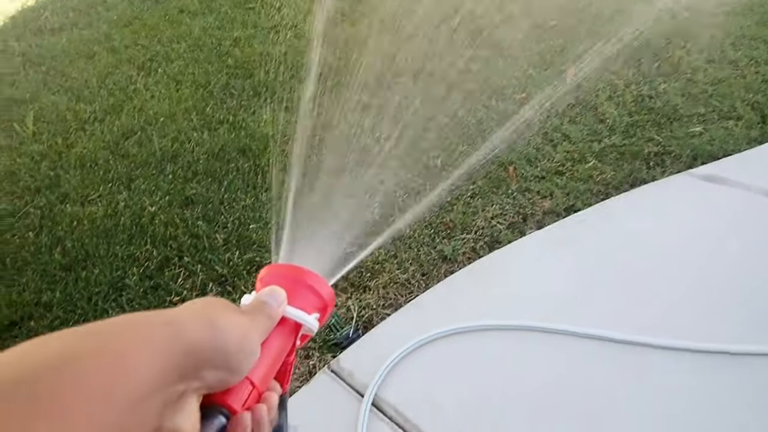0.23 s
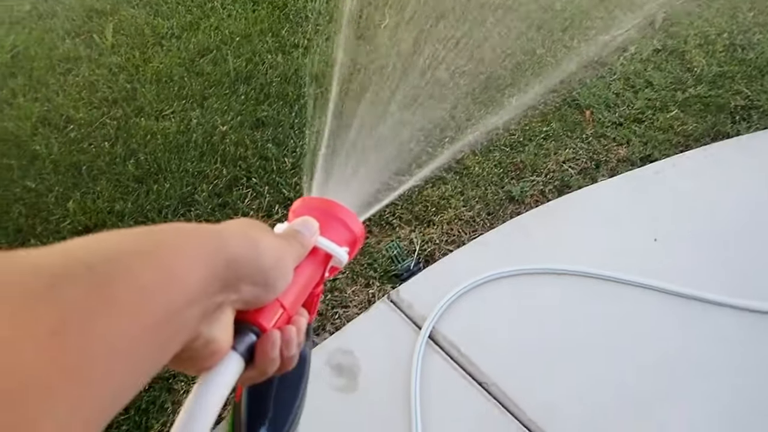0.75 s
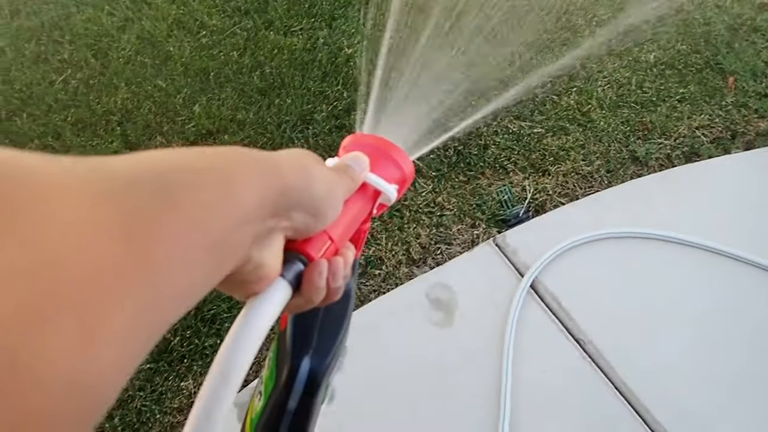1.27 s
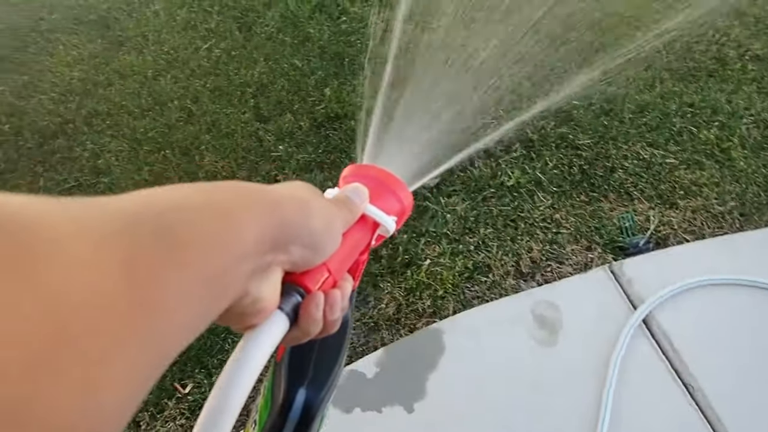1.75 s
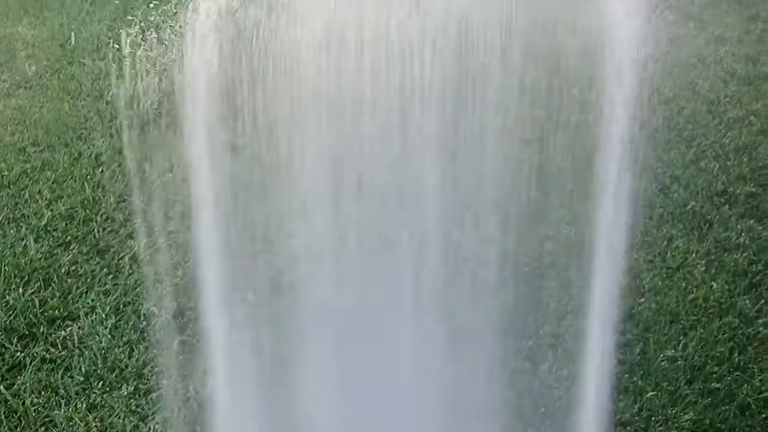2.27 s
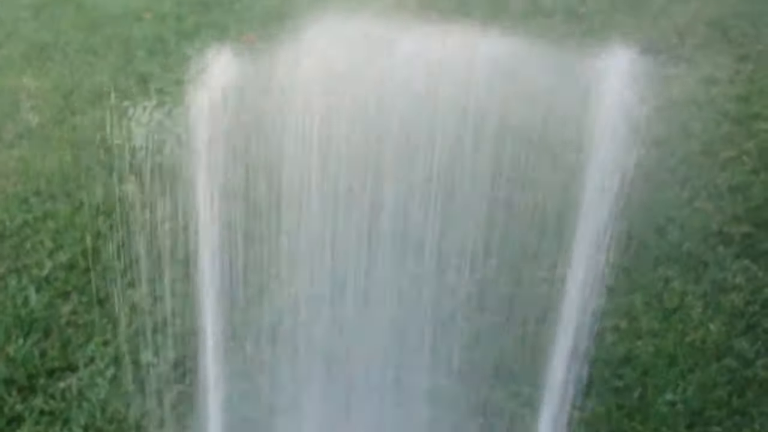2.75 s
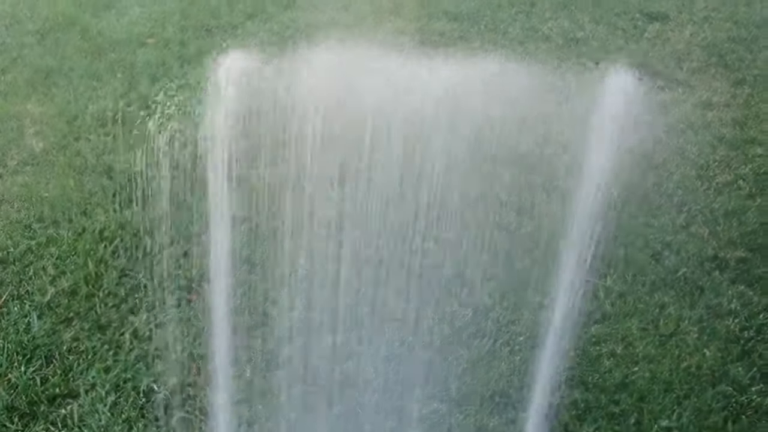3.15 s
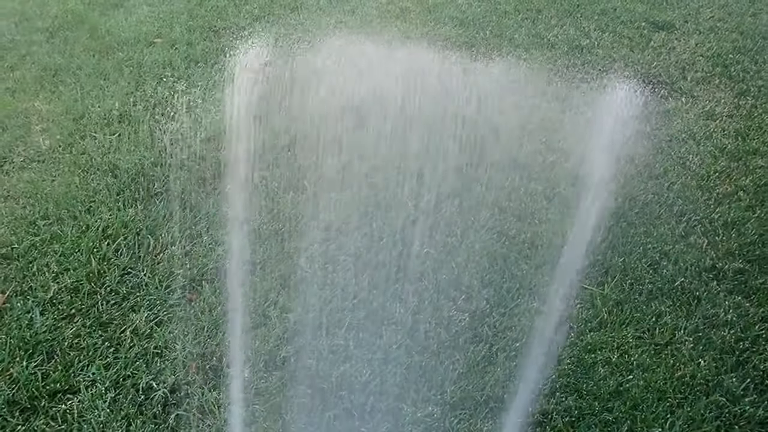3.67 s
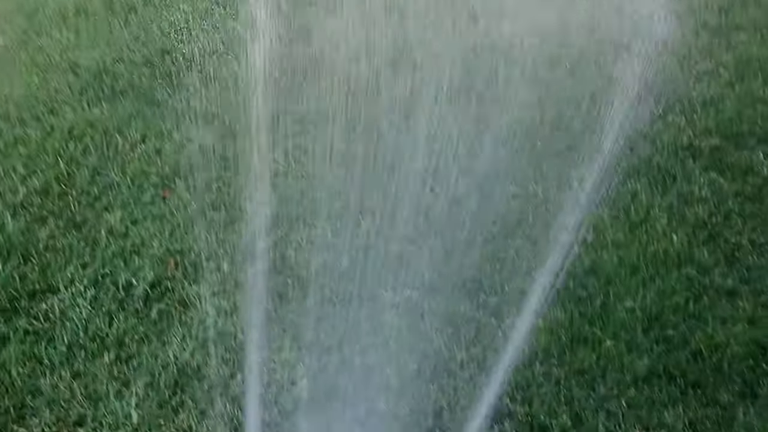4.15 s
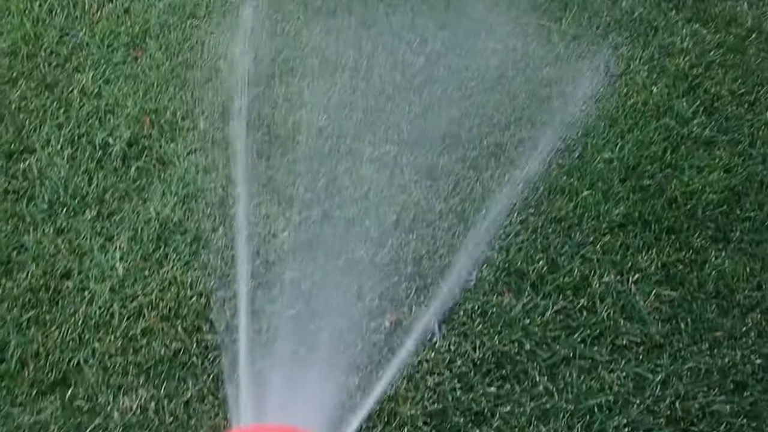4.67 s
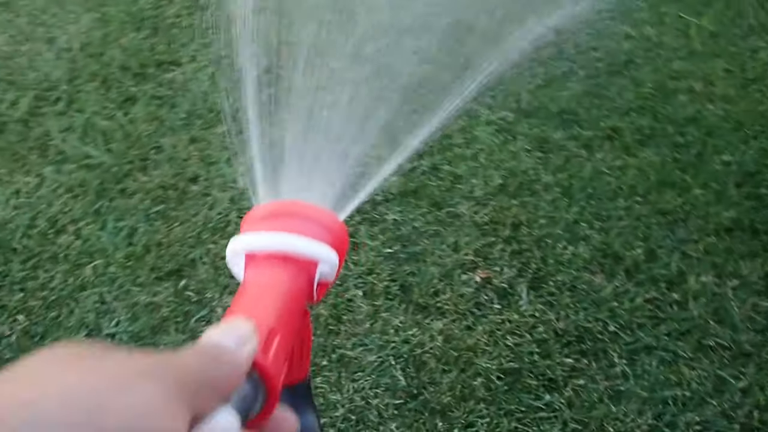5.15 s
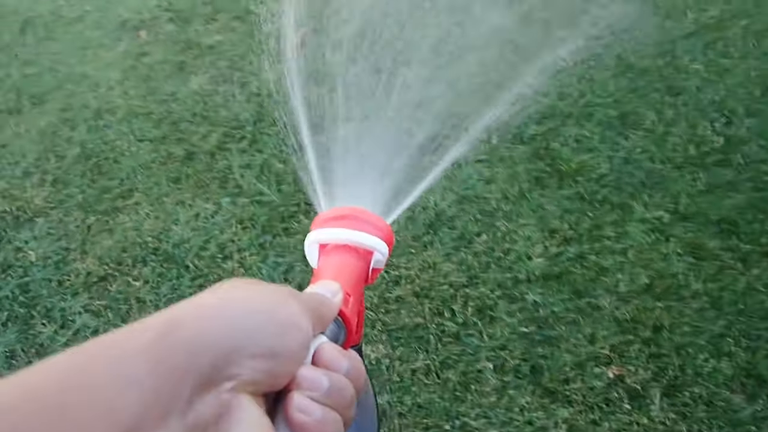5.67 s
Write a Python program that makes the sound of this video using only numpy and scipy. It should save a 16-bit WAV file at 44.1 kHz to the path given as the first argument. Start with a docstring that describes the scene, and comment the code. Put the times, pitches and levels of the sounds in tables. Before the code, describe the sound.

Water hisses from a handheld hose nozzle and patters on a lawn, with small spits and one brief dropout.

```python
"""On a lawn, a hand-held garden hose nozzle throws a fan of water. Puffs of air and a faint hose hum sit
at the back; the sheet of water tears into a fine fizz and into drops that patter on the grass. Up front,
trapped air spits out now and then, and turbulence in the slit hisses. The sound cuts out for an instant,
comes back from right beside the fan, then draws back behind the nozzle again."""
import sys
import numpy as np
from scipy.fft import rfft, irfft
from scipy.io import wavfile
from scipy.ndimage import uniform_filter1d, map_coordinates

SR = 44100
rng = np.random.default_rng(int(sys.argv[2]) if len(sys.argv) > 2 else 0)


def wav_record(signal):
    """Record a signal, one row per channel, as 16-bit PCM in the file named by sys.argv[1]."""
    frames = np.transpose(np.atleast_2d(signal))
    bounded = np.clip(frames, -1, 1)
    # unit amplitude maps onto the largest positive 16-bit level
    quanta = np.round(bounded * 32767).astype(np.int16)
    wavfile.write(sys.argv[1], SR, quanta)


N = 261072
TIME = np.arange(N) / SR
FREQ = np.maximum(np.arange(N // 2 + 1) * SR / N, 1)
MUTE_FROM_S, MUTE_TO_S = 1.9875, 2.1072


def from_db(db):
    """Decibels to gain."""
    return 10 ** (np.asarray(db) / 20)


def unit_power(x):
    """Normalise to an RMS of 1."""
    return x / np.sqrt(np.mean(x ** 2) + 1e-20)


def automation(rows):
    """One lane per value column, interpolated at every sample."""
    times, *columns = np.transpose(rows)
    return [np.interp(TIME, times, column) for column in columns]


def curve(points):
    """Breakpoints joined over log frequency, at every bin."""
    hz, value = np.transpose(points)
    return np.interp(np.log(FREQ), np.log(hz), value)


def drift(rate_hz):
    """Random modulation up to about this rate, RMS 1."""
    return unit_power(irfft(rfft(rng.standard_normal(N)) / (1 + (FREQ / rate_hz) ** 2), N))


def flutter(depth_db, rate_hz):
    """A gain that swells and sinks at random."""
    return from_db(depth_db * drift(rate_hz))


def grains(per_s, spread_db):
    """Two independent streams of tiny impacts: many small, few large."""
    sizes = from_db(spread_db * np.minimum(rng.exponential(1, (2, N)), 4))
    return unit_power(sizes * rng.standard_normal((2, N)) * (rng.random((2, N)) < per_s / SR))


def around(bearing, centre_deg, width_deg):
    """A soft bump, 1 at its centre."""
    return np.exp(-((bearing - centre_deg) / width_deg) ** 2)


# How alike the two mic ports sound: f/Hz, correlation
PORT_LIKENESS = [(30, .4), (70, .5), (130, .85), (300, .98), (1000, .998), (1500, .9998), (3400, .998),
                 (4200, .88), (5000, .93), (6000, .88), (7200, .97), (8600, .88), (9750, .68), (10700, .9),
                 (15000, .9)]
# Their balance: f/Hz, left over right/dB
PORT_BALANCE = [(100, -.7), (1000, 0), (3600, 0), (4150, -3), (4700, 3.3), (5800, 1), (6600, 3),
                (7500, 1.3), (8600, 4.8), (10500, 2.3), (14000, 2.8)]
# Their phase offset: f/Hz, left lead/rad
PORT_LEAD = [(3800, 0), (4350, -.8), (5200, -.05), (6200, -.3), (7200, 0), (8200, -.35), (9800, .2),
             (14000, .25)]

def stereo(streams, eq):
    """EQ two streams and spread them as mid and side over the mic ports, at unit power."""
    mid, side = rfft(streams) * eq
    likeness = np.clip(curve(PORT_LIKENESS), 0, 1)
    sign = np.array([[1], [-1]])
    pair = np.sqrt(1 + likeness) * mid + np.sqrt(1 - likeness) * side * sign
    balance = from_db(sign * curve(PORT_BALANCE) / 2)
    lead = np.exp(.5j * sign * curve(PORT_LEAD))
    return unit_power(irfft(pair * balance * lead, N))


# Soft puffs of air: t/s, level/dB, half-width/s
AIR_PUFFS = [(2.396, -46, 0.02), (2.678, -53, 0.04), (3.288, -47.5, 0.018)]
# Their low rumble: f/Hz, level/dB
DRAUGHT_EQ = [(10, -20), (60, -8), (130, -7), (250, -8), (500, -34)]

def draught():
    """Air pulled along by the water brushes the mic."""
    envelope = sum(from_db(db) * np.exp(-.5 * ((TIME - t) / width) ** 2) for t, db, width in AIR_PUFFS)
    return envelope * stereo(rng.standard_normal((2, N)), from_db(curve(DRAUGHT_EQ)))


# Partials of the hose and grip: f/Hz, starting level/dB
HUM_PARTIALS = [(235, -58), (292, -62), (935, -58)]

def hose_hum():
    """The flow hums in the hose while the grip is close by, wavering and fading until the mute."""
    hum = np.zeros(N)
    for hz, db in HUM_PARTIALS:
        phase = 2 * np.pi * np.cumsum(hz * (1 + 0.01315 * drift(rate_hz=9.5))) / SR
        hum += from_db(db) * np.sqrt(2) * np.sin(phase) * flutter(depth_db=3, rate_hz=8.2)
    return hum * from_db(-1.8 * TIME) * (TIME < MUTE_FROM_S)


# Drops on grass, from behind the nozzle: f/Hz, level/dB
PATTER_BEHIND_EQ = [(15, -47.5), (60, -11.5), (130, -5), (330, -0.5), (580, 1), (670, -6), (780, 2.5),
                    (1300, 2), (1700, 3.5), (2220, 4), (2600, -6), (3200, -14.5), (4500, -17)]
# The same from beside the fan: f/Hz, level/dB
PATTER_BESIDE_EQ = [(15, -35), (60, -18), (170, -9.5), (280, -4.5), (570, -1), (680, -7), (820, 0.5),
                    (1350, 1.5), (1850, -3), (2250, -1), (2600, -10.5), (3200, -16), (3800, -9),
                    (5000, -67)]

def patter(near_db, behind):
    """Drops land on the grass in a dense wash; two colours crossfade as the mic moves round."""
    rear = stereo(grains(per_s=16000, spread_db=2), from_db(curve(PATTER_BEHIND_EQ)))
    side = stereo(grains(per_s=14000, spread_db=1.6), from_db(curve(PATTER_BESIDE_EQ)))
    wash = np.sqrt(behind) * from_db(-37) * rear + np.sqrt(1 - behind) * from_db(-38.5) * side
    return from_db(near_db) * wash * flutter(depth_db=0.66, rate_hz=20)


def pan_treble(x, left_db):
    """The mic's body shades only short waves, so only the top above 4 kHz moves sideways."""
    treble = 1 / (1 + (4000 / FREQ) ** 16)
    change = from_db(left_db * np.array([[.5], [-.5]])) - 1
    return x + irfft(rfft(change * x) * treble, N)


# Airy top of the finest droplets: f/Hz, level/dB
MIST_EQ = [(3000, -82), (9000, -27), (10200, -12), (10850, -11), (11500, -11), (12000, -6.5), (12700, 0),
           (13400, -3), (14300, -5), (14900, -15.5), (15700, -14.5)]

def mist(near_db, behind):
    """The edge of the sheet tears into a fine fizz, which leans left beside the fan."""
    fizz = stereo(grains(per_s=26000, spread_db=2), from_db(curve(MIST_EQ)))
    fizz *= flutter(depth_db=.5, rate_hz=54)
    gain = from_db(-32 + 0.49 * near_db)  # rises about half as many dB as the patter
    return pan_treble(gain * fizz, left_db=3.4 * (.4 - behind))


# Air pockets bursting at the slit: t/s, pop peak before EQ/dB
AIR_POCKETS = [(0.098, -20), (0.105, -20), (0.1177, -20), (0.1974, -25.5), (0.2706, -25), (0.3186, -17.5),
               (0.577, -19), (0.7133, -20.5), (1.0809, -23), (1.1829, -22.5), (1.4112, -25), (1.5623, -24),
               (1.8968, -27), (1.9029, -19.5), (1.933, -20), (4.1235, -23.5)]
# Their bright attack: f/Hz, level/dB
CRACK_EQ = [(800, -39), (2400, -12.5), (3400, -8.5), (4300, -8), (5200, 3), (6200, -6.5), (7000, -10),
            (9300, -11.5), (11000, -8), (15000, -26.5)]

def spits():
    """Each air pocket gives the slit a sharp crack and pops for a couple of cycles."""
    rise_s, crack_over_pop_db = .0006, 13
    pops, clicks = np.zeros(N), np.zeros(N)
    for t, db in AIR_POCKETS:
        hz = min(1833 + 300 * t, 2200)  # big pockets leave first, so the pitch climbs and levels off
        peak = int((t + rise_s) * SR)
        span = np.arange(peak - SR // 200, peak + SR // 200)
        cycles = (span - peak) / SR * hz
        pops[span] += from_db(db) * np.exp(-.5 * (cycles / 0.83) ** 2) * np.cos(2 * np.pi * cycles)
        clicks[peak - int(SR / hz / 4)] = from_db(db + crack_over_pop_db)  # a quarter cycle early
    crack_eq = from_db(curve(CRACK_EQ))
    crack_spectrum = rfft(clicks) * crack_eq / irfft(crack_eq, N).max()
    port_dip = from_db(-6 * np.exp(-((FREQ - 3100) / 650) ** 4))  # the mic ports are dull here
    return irfft((rfft(pops) + crack_spectrum) * port_dip, N)


def rim_shadow(x, bearing):
    """The lower hiss thins out where the rim hides the slit, so the hiss seems to rise in pitch."""
    lows = irfft(rfft(x) / (1 + (FREQ / 6950) ** 20), N)
    duck_db = -3.5 * around(bearing, centre_deg=133, width_deg=15)
    return x + lows * (from_db(duck_db) - 1)


# Bounce off the hand and arm: t/s, delay/ms
ARM_DELAY = [(0, 1.523), (.45, 1.488), (1.2, 1.44), (2.0, 1.48), (2.1, .75), (5.9, .72)]

def arm_comb(x, behind):
    """From behind the hand its reflection combs the hiss, and the comb slides as the hand moves."""
    delay_ms, = automation(ARM_DELAY)
    read_at = (TIME - delay_ms / 1000) * SR
    reflection = np.array([map_coordinates(channel, [read_at], order=3) for channel in x])
    return x + 0.12 * behind * reflection


# The nozzle's low, middle and high resonances: f/Hz, width/Hz
NOZZLE_BANDS = [(5010, 840), (6650, 1200), (8120, 1500)]
# Their lobes, tighter for higher bands: peak gain/dB, aim/deg, spacing/deg, dip between/dB
NOZZLE_LOBES = [(3.5, 37.7, 187.5, 24.5), (-0.5, 74, 132, 16), (2, 51, 86, 21.5)]

def nozzle_tones(bearing):
    """Turbulence excites three broad tones, each beamed in lobes that the mic passes through."""
    tones = []
    for (hz, width_hz), (peak_db, aim, spacing, dip_db) in zip(NOZZLE_BANDS, NOZZLE_LOBES):
        resonance = 1 / (1 + 1j * (FREQ ** 2 - hz ** 2) / (FREQ * width_hz)) ** 2
        beam = from_db(peak_db - dip_db * np.sin(np.pi * (bearing - aim) / spacing) ** 2)
        tones.append(beam * stereo(grains(per_s=32000, spread_db=1), resonance))
    return tones


# Bright body of the jet: f/Hz, level/dB
HISS_EQ = [(1000, -68), (2800, -26.5), (3400, -21.5), (4200, -11), (4800, -3.5), (5700, -0.5), (6300, 1),
           (6700, 2.5), (7300, -1), (8700, 0), (9500, -1.5), (10200, -21.5), (11500, -27), (14000, -48)]

def nozzle_hiss(bearing, near_db, behind):
    """Turbulence in the slit hisses under the three tones; the lowest one sputters."""
    body = stereo(grains(per_s=42000, spread_db=0), from_db(curve(HISS_EQ)))
    low, middle, high = nozzle_tones(bearing)
    tones = low * flutter(depth_db=1, rate_hz=110) + middle + high
    hiss = (from_db(2.5) * body + from_db(-1) * tones) * flutter(depth_db=0.68, rate_hz=190)
    hiss = arm_comb(rim_shadow(hiss, bearing), behind)
    mouth_swell_db = 4 * around(bearing, centre_deg=114, width_deg=27.4)
    slit_gain, sheet_gain = from_db(-32.5 + mouth_swell_db), from_db(-35.5 + near_db)
    hiss *= np.hypot(slit_gain, sheet_gain)
    return pan_treble(hiss, left_db=-0.25 - .17 * near_db)  # from left towards centre as the fan nears


# The mic's move round the spray: t/s, bearing from the jet's axis/deg, distance from the fan/m
MIC_PATH = [(0, 153, 1.98), (.7, 151, 1.95), (1.2, 171, 2.02), (1.99, 175, 2.05), (2.1, 39, 0.5),
            (2.55, 43, 0.5), (3.0, 62, 0.74), (3.7, 64.5, 0.9), (4.3, 82, 1.11), (4.85, 110, 1.45),
            (5.2, 127.5, 1.83), (5.9, 145, 2.4)]

def scene():
    """Mix the layers; the mic's position rides the hiss, the fizz and the patter."""
    bearing, distance = automation(MIC_PATH)
    near_db = -20 * np.log10(distance)  # 0 dB at one metre
    behind = .5 + .5 * np.tanh((bearing - 126) / 27)  # 0 beside the fan, 1 behind the hand
    spray = nozzle_hiss(bearing, near_db, behind) + mist(near_db, behind) + patter(near_db, behind)
    return spray + spits() + hose_hum() + draught()


def record(dry):
    """Master: a brief mute, a quick swell back in and a steep high cut."""
    swell_db, swell_s, cutoff_hz = 10.5, 0.067, 15780
    swell = from_db(-swell_db * np.exp(-np.maximum(TIME - MUTE_TO_S, 0) / swell_s))
    fader = uniform_filter1d((TIME < MUTE_FROM_S) + swell * (TIME > MUTE_TO_S), size=24)
    high_cut = 1 / np.sqrt(1 + (FREQ / cutoff_hz) ** 400)
    return irfft(rfft(dry * fader) * high_cut, N)


dry = scene()
out = record(dry)
wav_record(out)
```